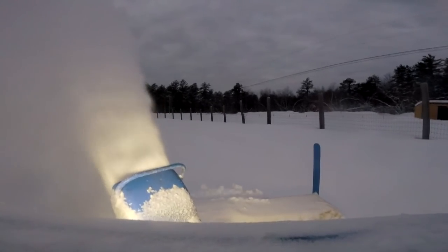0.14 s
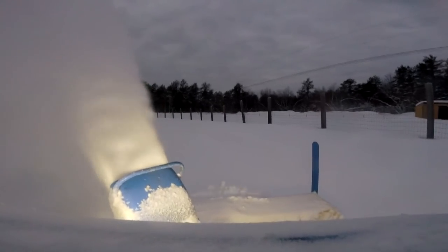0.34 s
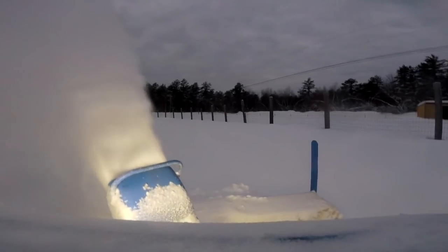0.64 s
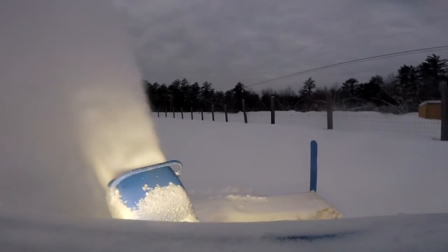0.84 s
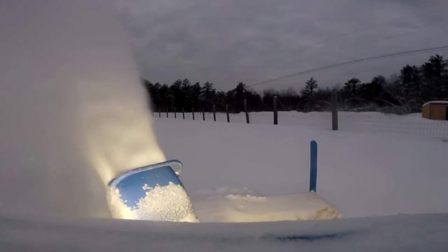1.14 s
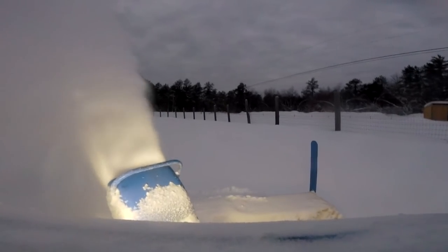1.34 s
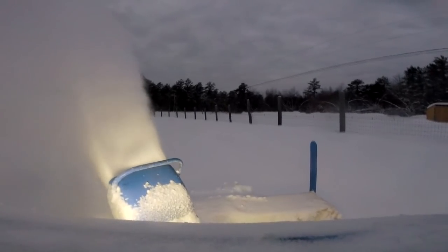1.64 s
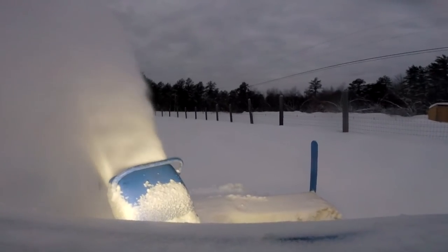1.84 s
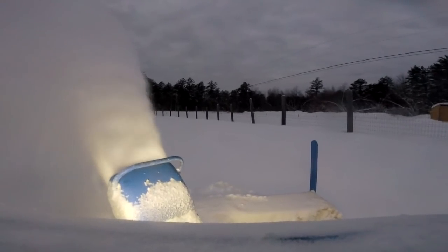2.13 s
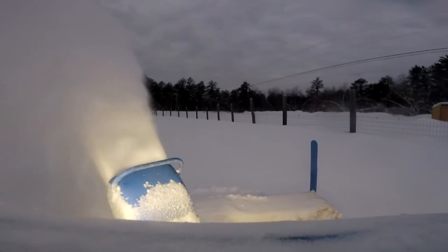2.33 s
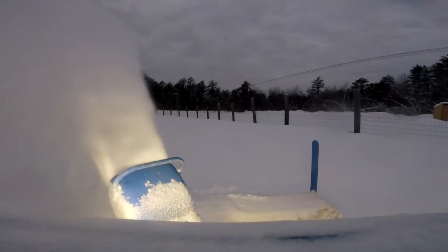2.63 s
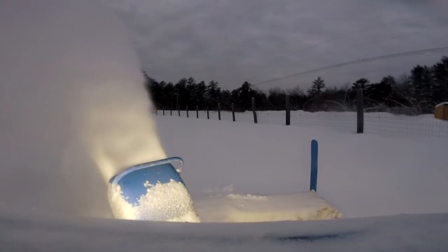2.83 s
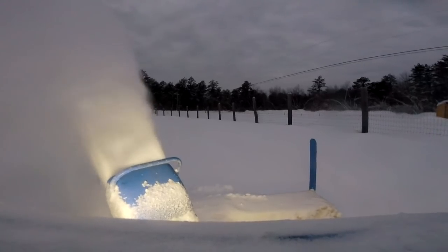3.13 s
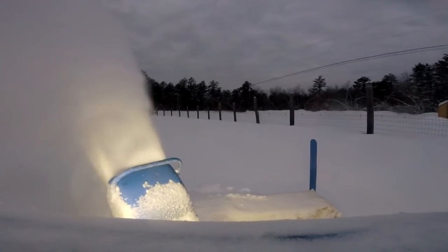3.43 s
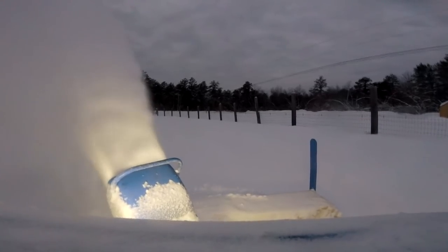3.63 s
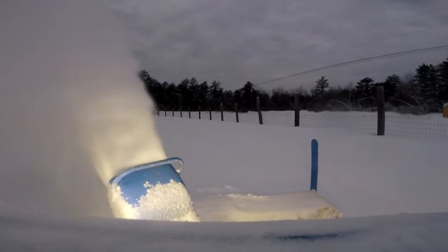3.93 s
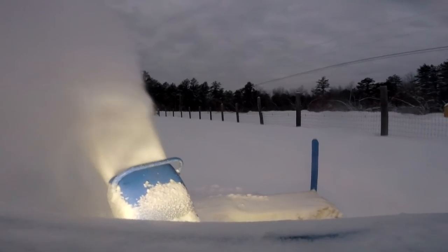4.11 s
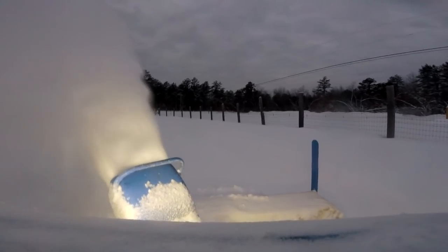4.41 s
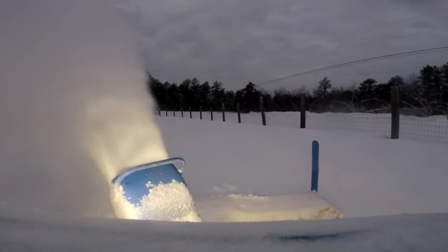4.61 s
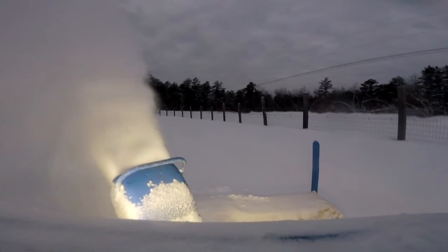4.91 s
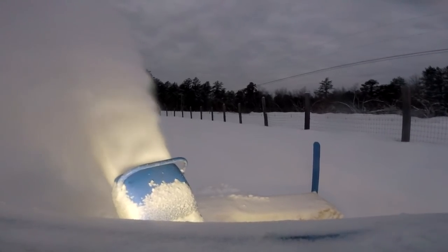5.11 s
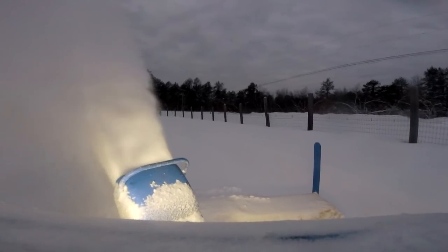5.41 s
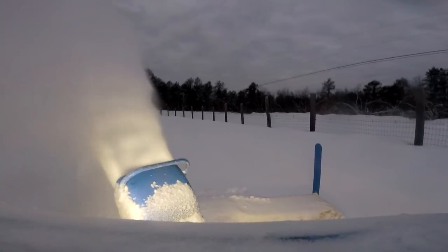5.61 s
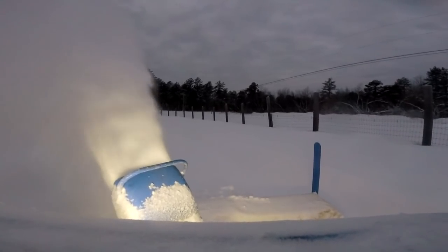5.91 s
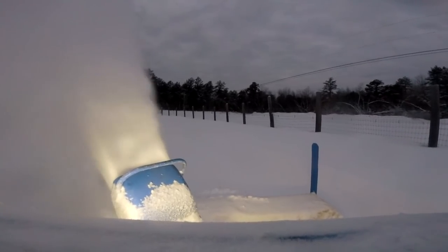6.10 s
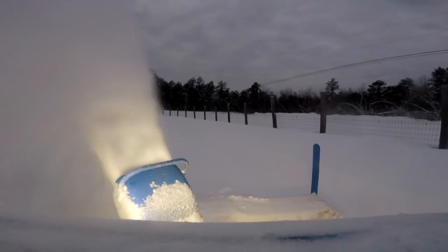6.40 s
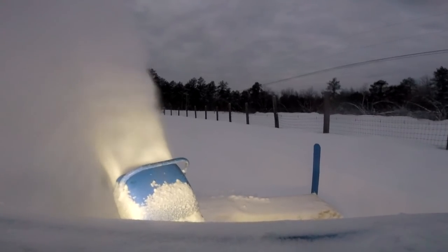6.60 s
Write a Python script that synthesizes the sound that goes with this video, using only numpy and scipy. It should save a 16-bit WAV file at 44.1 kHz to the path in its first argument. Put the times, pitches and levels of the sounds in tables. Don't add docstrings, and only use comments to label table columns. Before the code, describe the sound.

From 0 s to the end near 6.75 s, a small tractor engine runs without pause under load, driving a snowblower outdoors, with the microphone close to the hood. The low exhaust drone is strongest near 47 Hz, with firing pulses about 23 to 24 times a second, and a blade hum near 75 Hz beats against it. Broad, low roaring of snow and air fills the steel housing; the chute adds a hollow boom around 150 Hz. Rapid valve ticks, gear rattle and block clatter make a gritty metallic mid-range, over a faint transmission whine. The first two seconds are heaviest and boomiest. From about 2 to 3.5 s the engine picks up very slightly and the boom eases. Small surges of boom come near 3.6, 5 and 6.1 s, with lighter moments near 4.5, 5.5 and the end. Treble stays modest, the sound dense and steady.

```python
import sys
import numpy as np
from scipy import signal
from scipy.fft import rfft, irfft, next_fast_len
from scipy.io import wavfile
from scipy.ndimage import uniform_filter1d, map_coordinates

SR = 44100
rng = np.random.default_rng(int(sys.argv[2]) if len(sys.argv) > 2 else 0)


def boost(x):
    u = np.asarray(x, float) / 20
    return 10 ** u


def pcm_store(signal):
    levels = np.round(np.clip(np.atleast_2d(signal), -1, 1) * 32767)
    wavfile.write(sys.argv[1], SR, levels.astype(np.int16).T)


N = 297675

BELT = .794226
BLADES = 4
EXHAUST_AT = .68


def unit(x):
    return x / np.sqrt(np.mean(x ** 2) + 1e-20)


def along(points, hz):
    f, v = np.transpose(points)
    return np.interp(np.log(hz + 1), np.log(f + 1), v, left=-120, right=-120)


def curves(rows):
    s, *cols = np.transpose(rows)
    return [np.interp(np.arange(N) / SR, s, c) for c in cols]


def wobble(rate):
    knots = rng.standard_normal(int(N * rate / SR) + 4)
    return map_coordinates(knots, [np.arange(N) * rate / SR])


def coloured(x, spectrum):
    # f/Hz, width/Hz, level/dB
    panels = [(570.5, 75, 10), (793, 43, 2.5), (862, 33, -3), (994, 55, 1), (1680, 26, 6), (1705, 60, -5.5),
              (2407, 146, 7.5), (2814, 160, 3), (5470, 630, 7), (6400, 680, 4.5)]
    m = next_fast_len(N + 8192)
    hz = np.fft.rfftfreq(m, 1 / SR)
    bumps_db = sum(db / (1 + (2 * (hz - centre) / width) ** 2) for centre, width, db in panels)
    gain = boost(along(spectrum, hz) + bumps_db)
    return unit(irfft(rfft(x, m) * gain, m)[:N])


def patchy(depth_db):
    z = signal.stft(rng.standard_normal(N + 512), nperseg=512)[2]
    field = uniform_filter1d(rng.standard_normal(z.shape), 6, 0)
    field = uniform_filter1d(field, 10, 1)
    return signal.istft(z * boost(depth_db * unit(field)), nperseg=512)[1][:N]


def tones(turns, orders, first, unsteady_db):
    out = np.zeros(N)
    for k, db in orders:
        late = rng.random() * (k > first)
        shake_db = unsteady_db * (1 + (k > first)) * wobble(5)
        out += boost(db + shake_db) * np.sin(2 * np.pi * (k * turns + late))
    return np.sqrt(2) * out


def whine(cycle):
    # multiple of the firing cycle, rms level/dB
    mesh_orders = [(69.72, -60), (70.72, -56), (71.72, -62), (34.35, -57)]
    return tones(cycle, mesh_orders, 0, unsteady_db=0.8)


def gears(cycle):
    # f/Hz, level/dB per Hz
    gear_spectrum = [(450, -22.5), (600, -4), (1000, 0), (1500, -0.5), (2000, -12), (2800, -17),
                     (3500, -37)]
    size = round(SR / 23.7)
    turn = np.arange(size) / size
    swell_db = 4 * np.cos(4 * np.pi * (turn - .22))
    rattle = rng.standard_normal(size) * boost(swell_db)
    played = map_coordinates(rattle, [cycle % 1 * size], mode="grid-wrap")
    return boost(-46.5 + 1.6 * wobble(6)) * coloured(played, gear_spectrum)


def valves(cycle, load_db):
    # f/Hz, level/dB per Hz
    tick_spectrum = [(1500, -15), (2500, 0), (3500, -6), (4400, -11), (5500, -25), (7500, -24), (9500, -16),
                     (11500, -33), (14500, -56)]
    valve_at = .285
    seats = np.flatnonzero(np.diff(np.floor(cycle - valve_at)) > 0)
    t = np.arange(600) / SR
    shape = rng.standard_normal(len(t))
    draws = rng.standard_normal((len(seats), len(t) + 2))
    hardness_db, jitter = 2.0 * draws[:, :1], np.round(12 * draws[:, 1:2]).astype(int)
    decay_db = 60 * t / .018
    ticks = (shape + 1.3 * draws[:, 2:]) * boost(hardness_db - decay_db)
    at = seats[:, None] + jitter + np.arange(len(t))
    train = np.bincount(np.clip(at, 0, N - 1).ravel(), ticks.ravel(), N)
    return boost(load_db - 10) * coloured(train, tick_spectrum)


def clatter(cycle, load_db):
    # f/Hz, level/dB per Hz
    block_spectrum = [(900, -18), (1700, 0.5), (2200, -9), (3300, -10.5), (4000, -18.5), (4800, -22),
                      (5800, -20.5), (7200, -21), (8200, -26.5), (9600, -31), (10500, -37.5), (12000, -50),
                      (14500, -56)]
    busy_from, busy_to, ramp = .12, .85, .1
    share = cycle % 1
    busy = np.clip(np.minimum(share - busy_from, busy_to - share) / ramp + .5, 0, 1)
    knock_db = .7 * np.cos(2 * np.pi * 6 * (share - .18))
    turn_db = .6 * np.cos(4 * np.pi * (share - .24))
    stroke_db = busy * (2.4 + knock_db) + turn_db
    hardness_db = 0.49 * wobble(45) + 0.41 * wobble(6.7)
    noise = boost(stroke_db + hardness_db) * patchy(depth_db=-0.5)
    return boost(load_db + 1.5) * coloured(noise, block_spectrum)


def roar(load_db, boom_db):
    # f/Hz, level/dB per Hz
    housing_spectrum = [(18, -32), (32, -18), (65, -1), (115, -9), (165, -8.5), (200, -8), (260, -5.5),
                        (380, -7), (480, -13.5), (700, -15), (900, -17), (1100, -15), (1650, -20.5),
                        (2200, -31)]
    # f/Hz, level/dB per Hz
    chute_spectrum = [(100, -35), (135, -10), (165, -4), (190, -12), (240, -24)]
    boom = boost(boom_db - 40) * coloured(patchy(depth_db=0.5), chute_spectrum)
    return boost(load_db + 4) * coloured(patchy(depth_db=-0.15), housing_spectrum) + boom


def impeller(cycle):
    # multiple of the impeller shaft, rms level/dB
    blade_orders = [(4, -30), (8, -37), (12, -39), (16, -39), (20, -47), (24, -49), (28, -51), (36, -57)]
    halfway = [(k - BLADES / 2, -50) for k, db in blade_orders[:5]]
    shaft = BELT * cycle
    blade = tones(shaft, blade_orders[:1] + halfway, 4, unsteady_db=0.5)
    return blade - tones(shaft, blade_orders[1:], 21, unsteady_db=0.6)


def beats(cycle):
    shaken_orders = (1, 2, 4, 5, 6, 8, 10, 11)
    firing, blade = cycle - EXHAUST_AT, BLADES * BELT * cycle
    out = np.zeros(N)
    for k in shaken_orders:
        for side, db in ((-1, -51), (1, -59)):
            out -= tones(k * firing + side * blade, [(1, db)], 0.98, unsteady_db=3.0)
    return out


def exhaust(cycle, boom_db, note_db):
    # multiple of the firing cycle, rms level/dB
    firing_orders = [(1, -46), (2, -26), (3, -35), (4, -35), (6, -44), (7, -36), (8, -47), (10, -39),
                     (12, -47), (14, -44), (15, -40), (16, -39), (17, -47), (18, -44)]
    loaded_orders = (4, 7, 16)
    pipe_orders, pipe_lag = range(5, 13), .12
    between = [*range(1, 20), 24, 33, 36]
    weak = [(k, -52) for k in between if k not in dict(firing_orders)]
    orders = []
    for k, db in firing_orders + weak:
        swell_db = 1.2 * boom_db - .6 if k in loaded_orders else note_db
        orders.append((k, db + swell_db))
    frame = [o for o in orders if o[0] == loaded_orders[0]]
    pipe = [o for o in orders if o[0] in pipe_orders]
    rest = [o for o in orders if o[0] != loaded_orders[0] and o[0] not in pipe_orders]
    firing = cycle - EXHAUST_AT
    direct = tones(firing, rest, 3.3, unsteady_db=0.92)
    through_frame = tones(firing, frame, 4.6, unsteady_db=1.8)
    through_pipe = tones(firing - pipe_lag, pipe, 13, unsteady_db=0.25)
    return direct - through_frame - through_pipe


def scene():
    # t/s, firing cycles per s
    speed_course = [
        (0, 23.422),
        (1.5, 23.556),
        (3.5, 23.75),
        (5.1, 23.739),
        (6.75, 23.793),
    ]
    # t/s, level/dB
    snow_course = [
        (0, -1),
        (1, 0.5),
        (2, 1.5),
        (3, -1),
        (3.6, 2.5),
        (4.5, -3),
        (5, 2),
        (5.5, -3.5),
        (6.1, 2),
        (6.75, -3),
    ]
    speed, = curves(speed_course)
    cycle = np.cumsum(speed) / SR
    sag = 23.65 - speed
    roar_db, clatter_db = -33 - 0.3 * sag, -47.5 - 2 * sag
    boom_db, note_db = 15 * sag + curves(snow_course)[0], -3.5 * sag
    blower = roar(roar_db, boom_db) + impeller(cycle)
    block = whine(cycle) + gears(cycle) + valves(cycle, clatter_db) + clatter(cycle, clatter_db)
    return (blower + block + beats(cycle) + exhaust(cycle, boom_db, note_db))[None]


def roll_off(x):
    return signal.sosfilt(signal.butter(12, 14255, fs=SR, output="sos"), x)


def record(dry):
    power = np.abs(uniform_filter1d(dry ** 2, 900, axis=1))
    evened = dry * (power / np.mean(power) + .05) ** -.09
    ceiling, offset = .255, -.0016
    soft = evened / (1 + np.abs(evened / ceiling) ** 5) ** (1 / 5) + offset
    return roll_off(soft)


dry = scene()
out = record(dry)
pcm_store(out)
```